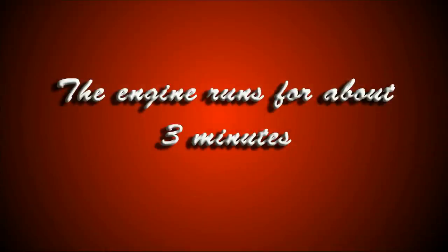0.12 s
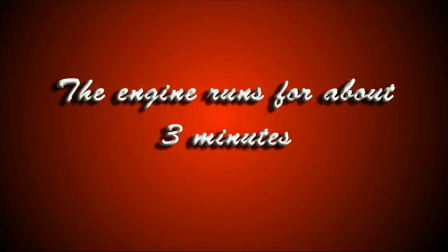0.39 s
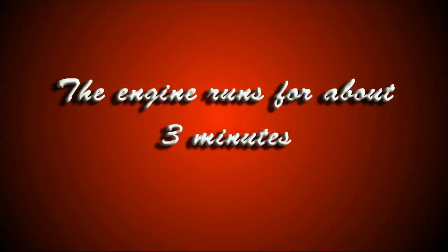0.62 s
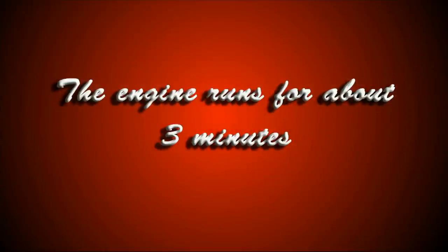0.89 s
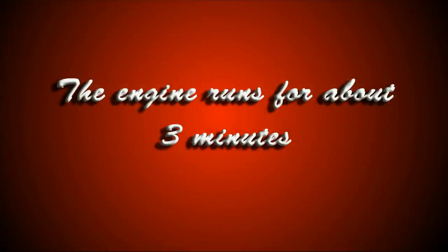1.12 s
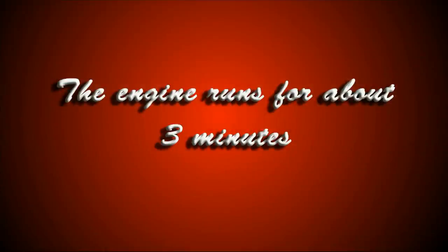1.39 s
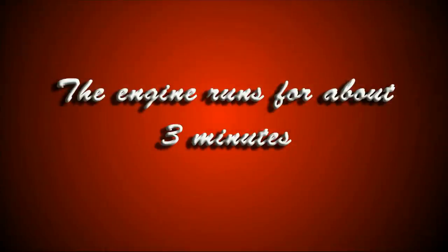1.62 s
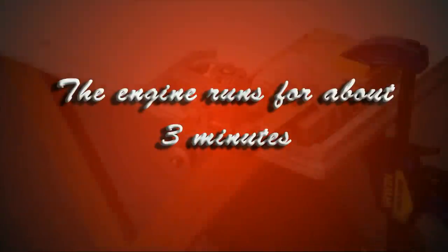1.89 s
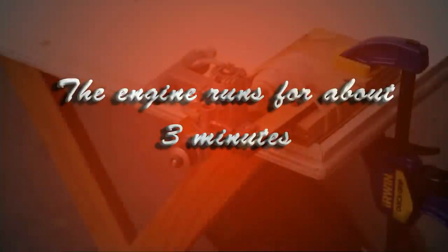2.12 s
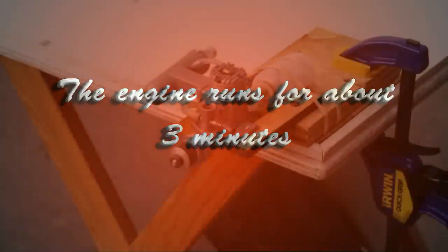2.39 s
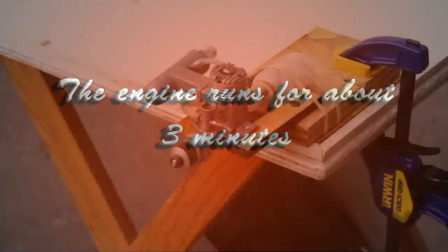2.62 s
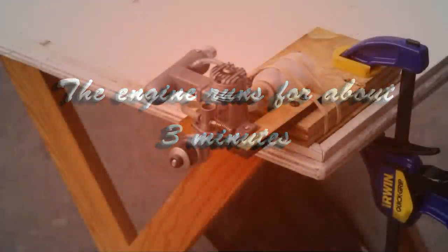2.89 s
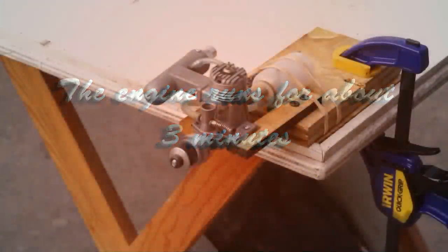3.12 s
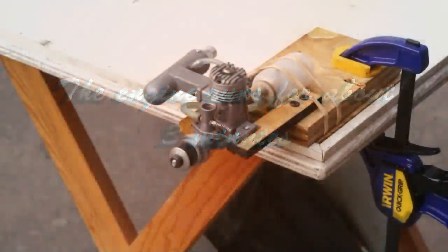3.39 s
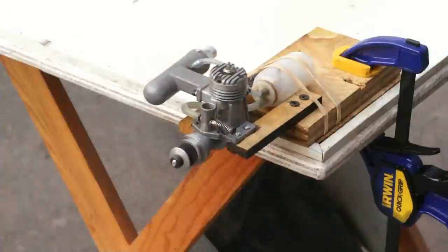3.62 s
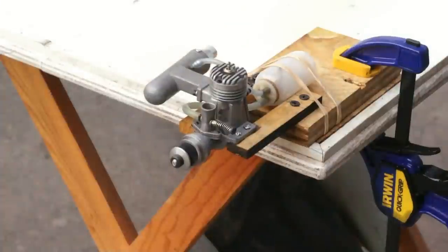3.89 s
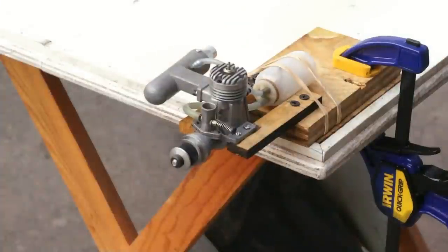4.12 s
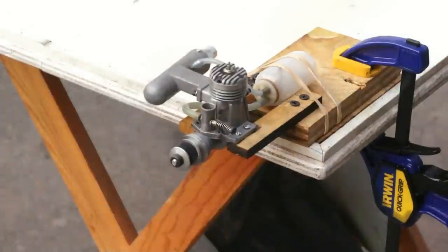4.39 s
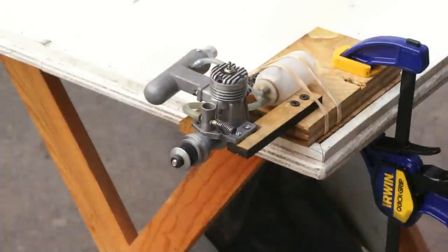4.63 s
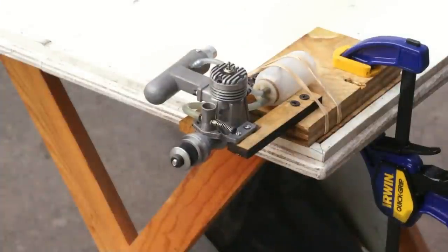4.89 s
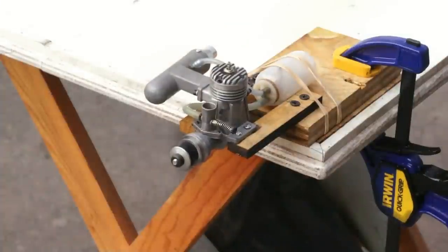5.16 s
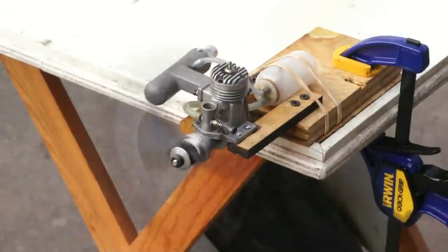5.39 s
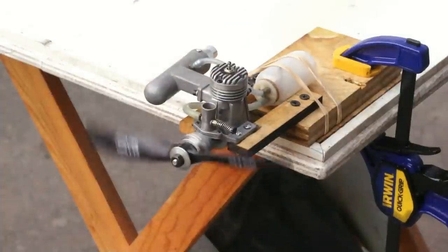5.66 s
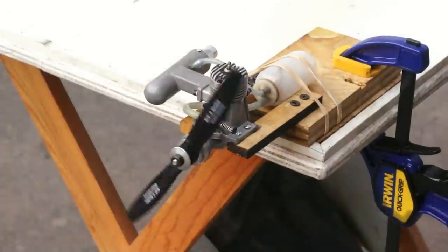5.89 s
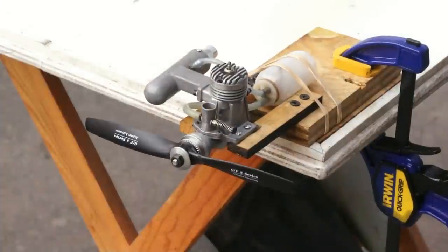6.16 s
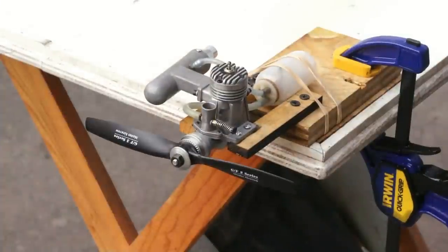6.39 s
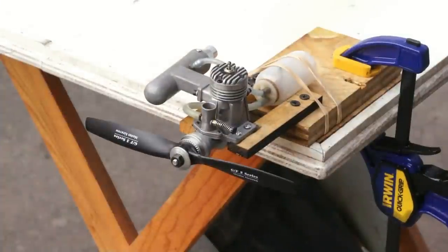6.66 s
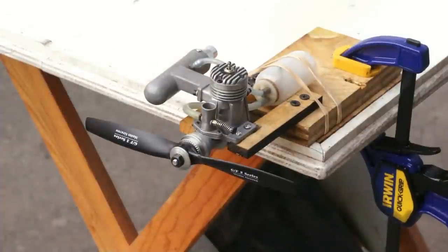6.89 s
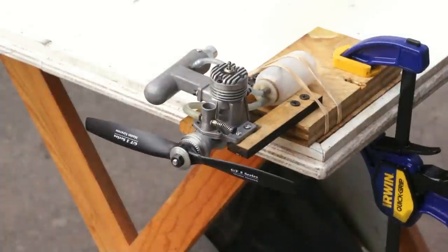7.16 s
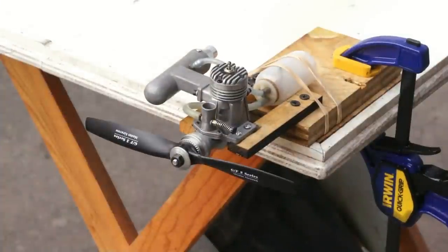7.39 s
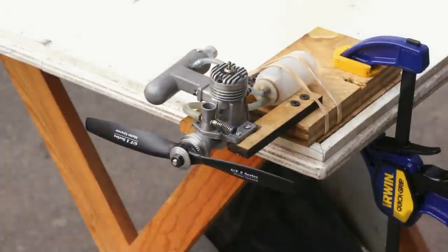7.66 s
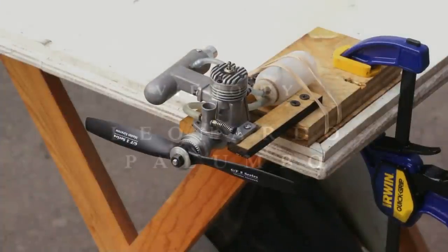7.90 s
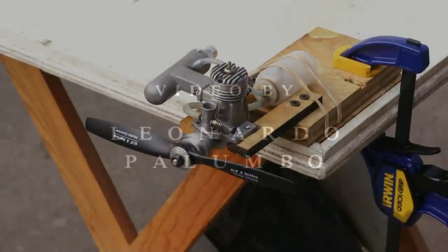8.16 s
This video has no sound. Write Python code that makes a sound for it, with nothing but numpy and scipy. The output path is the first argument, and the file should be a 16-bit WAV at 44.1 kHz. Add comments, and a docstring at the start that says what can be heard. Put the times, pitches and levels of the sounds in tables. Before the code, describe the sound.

Close outdoors, a tiny two-stroke engine clamped to a table screams at a steady, raspy buzz with bright hiss. It grows rougher, drops quickly in pitch to separate popping beats with clamp rattle and table shake, then stops. A few hollow, slowing bumps and ticks follow, then quiet low hum with faint rustle and a couple of dull knocks.

```python
"""Outdoors, at a trestle table: a small two-stroke glow engine clamped on top screams at full speed,
starves, slows through the table's resonances and stops after a few last compressions.
Summed multiples of the firing rate make the scream, ringing clicks the pops, rattle and table shake,
and pulsing noise the gas. Ticks, knocks and thin whistles of filtered noise follow, over a quiet
hum and rustle of shaped noise."""
import sys
import numpy as np
from scipy import signal
from scipy.fft import rfft, irfft, next_fast_len
from scipy.io import wavfile
from scipy.ndimage import uniform_filter1d

SR = 44100
rng = np.random.default_rng(int(sys.argv[2]) if len(sys.argv) > 2 else 0)


def amplitude_ratio(level_db):
    """Convert a level in decibels to the matching linear amplitude (field) ratio."""
    exponent = np.asarray(level_db, float) / 20
    return 10 ** exponent


def unload_wav(signal):
    """Save mono or channel-first audio to the path in sys.argv[1] as 16-bit WAV at rate SR, clipped to [-1, 1]."""
    wavfile.write(
        sys.argv[1],
        SR,
        np.round(np.clip(np.atleast_2d(signal).T, -1, 1) * 32767).astype(np.int16),
    )


N = 365133
STOP_S = 5.372   # the engine no longer fires


def rms_one(x):
    """Scaled to rms 1."""
    return x / np.sqrt(np.mean(x ** 2) + 1e-20)


def in_time(rows):
    """Table columns drawn as automation, one value a sample."""
    s, *columns = np.transpose(rows)
    return [np.interp(np.arange(N) / SR, s, c) for c in columns]


def at_hz(points, hz):
    """A curve over frequency, read on a log axis."""
    point_hz, level_db = np.array(points).T
    return np.interp(np.log(hz), np.log(np.maximum(point_hz, 1)), level_db)


def drift(rate, size):
    """Slow random wander between normally distributed knots, 2 * rate of them a second."""
    knots = rng.standard_normal(int(N / SR * rate * 2) + 2)
    return np.interp(np.arange(size) / SR * rate * 2, np.arange(len(knots)), knots)


def resonance(x, hz, width_hz):
    """Two-pole peak with gain 1 on top."""
    r = np.exp(-np.pi * width_hz / SR)
    zeros = [(1 - r * r) / 2, 0, (r * r - 1) / 2]
    poles = [1, -2 * r * np.cos(2 * np.pi * hz / SR), r * r]
    return signal.lfilter(zeros, poles, x + 1e-18)


def twice(x, hz, width_hz):
    """A resonance with steeper flanks."""
    return resonance(resonance(x, hz, width_hz), hz, width_hz)


def body(x, modes):
    """Parallel resonances of a solid or hollow body, signs alternating."""
    return sum((-1) ** k * amplitude_ratio(db) * resonance(x, hz, width) for k, (hz, width, db) in enumerate(modes))


def evened(x, window_s):
    """Running level divided out."""
    return x / np.sqrt(uniform_filter1d(x ** 2, int(window_s * SR), axis=-1) + 1e-12)


def coloured(spectrum, likeness, size):
    """Stereo noise of a given spectrum, the channels alike to a degree; rms 1."""
    length = next_fast_len(size)
    hz = np.arange(length // 2 + 1) * SR / length + 1
    alike = np.clip(at_hz(likeness, hz), 0, 1)
    mid, side = rfft(rng.standard_normal((2, length)))
    pair = np.sqrt(1 + alike) * mid + np.sqrt(1 - alike) * side * np.array([[1], [-1]])
    return rms_one(irfft(pair * amplitude_ratio(at_hz(spectrum, hz)), length)[:, :size])


def spread(x, echo_db, delays_s):
    """Table top and ground send short echoes, other ones to each microphone."""
    out = np.array([x, x])
    for side, delay in enumerate(delays_s):
        lag = int(delay * SR)
        out[side % 2, lag:] += amplitude_ratio(echo_db) * x[:-lag]
    return out


def impulses(turns, spread_db, weak_db):
    """One click per whole turn, sizes uneven, every second one changed by weak_db."""
    at = np.flatnonzero(np.diff(np.floor(turns)))
    out = np.zeros(len(turns))
    uneven_db = spread_db * rng.standard_normal(4000)[:len(at)]
    out[at] = amplitude_ratio(uneven_db + weak_db * (np.arange(len(at)) % 2))
    return out


def slowness(hz):
    """0 at 125 firings a second and above, 1 from 75 down."""
    return np.clip((125 - hz) / 50, 0, 1)


def singleness(hz):
    """How far the firings are heard singly: 0 above 202.7 a second, 1 below 167.7."""
    return np.clip((167.7 - hz) / 35 + 1, 0, 1)


def crawling(hz):
    """Rises from 0 to 1 as the engine crawls from 93 to 46.5 firings a second."""
    return np.clip(2 - 2 * hz / 93, 0, 1)


def puff(turns):
    """Gas rushes out just after the port opens, then thins until the next turn."""
    return np.exp(-2.5 * (turns % 1))


def muffler_gap(x, hz):
    """The muffler swallows a band around 2600 Hz at low speed."""
    return x - 0.8 * slowness(hz) * resonance(x, 2600, 420)


# Firing speeds at which the tone colour flips: speed_hz
FLIP_SPEEDS = [212.6, 214.8, 217.5, 219.15]
# Multiples of the firing rate from the second up, one a row:
# full_speed_db, dipping_db, sagging_db, sagging_further_db, lean_db
MULTIPLES = [(-0.5, -1.5, -2, -1, -6.5), (-6.5, -8.5, -12, -12, -5), (-3.5, -1, -2.5, -0.0, -0.5),
             (-14, -14.5, -18.5, -11, -6), (-10.5, -11, -8, -3, -6.5), (-9.5, -8, -3, -3.0, -0.5),
             (1.0, 0.5, -7.5, 1.0, -2), (-11, -8.5, -20, -10, -0.5), (-4.5, -11.5, -5, -6.0, -8),
             (-3.5, 1, -0.0, -2, -1), (-3.0, 0.5, -6.5, -3.5, -2), (-8, -5, -10.5, -12, -8),
             (-3, -13.5, -11, -2.5, -3.5), (-8, -9.5, -8.5, -13, -14.5), (-13.5, -11, -8, -15, -6.5),
             (-18, -15, -12.5, -20, -16), (-10.5, -10, -13.5, -4.5, -8), (-14, -17, -4, -18, -7.5),
             (-4.5, -3, -10, -3.5, -5.5), (-5.5, -4.5, -4.5, -9, -14), (-9.0, -4.5, -9.5, -14, -7.5),
             (-11.5, -14, -16, -15.5, -16), (-12, -18.5, -23.5, -9.5, -12.5), (-12, -8, -10.0, -9.5, -15),
             (-11, -15, -20, -21, -15), (-11, -12, -11, -25, -20.5), (-8, -9, -4.5, -7, -13.0),
             (-10.0, -11.5, -14.5, -10.5, -11.5), (-13.5, -9, -15, -11, -16), (-11.5, -19, -23, -12, -14.5),
             (-9, -13, -8.5, -9.5, -12.5), (-19.5, -22, -21.5, -25.5, -20.5), (-20.5, -14.5, -21, -19, -12),
             (-26.5, -19.5, -22, -15, -19), (-19.5, -13.5, -18, -16.5, -19.5), (-14, -13, -17, -27, -18.5),
             (-31, -19.0, -20.5, -20, -21.5), (-23, -19.5, -18, -21, -25.5), (-23, -21, -25.5, -30, -27.5)]
# Halves .5, 1.5, 2.5 .. from strong and weak firings in turn, one a row:
# full_speed_db, dipping_db, sagging_db, sagging_further_db, lean_db
HALF_ORDERS = [(-19, -17.5, -16.5, -16.5, -17.5), (-21.5, -20.5, -20, -16.5, -16.5),
               (-8.5, -9.0, -8, -11.5, -13.5), (-3, -1.5, -3.0, -4.5, -12.5),
               (-22.5, -15.5, -13, -11.5, -8.5), (-11.5, -16, -9, -7.5, -16), (-7, -8, -3.5, -16.5, -12),
               (-13.5, -11, -6, -9.5, -16), (-20.0, -16.5, -21, -28, -12.5),
               (-13.5, -18, -15.5, -11.5, -24.5), (-20.0, -21, -18, -17.5, -25.5),
               (-26, -19.5, -26.5, -21.5, -28.5), (-22.5, -26, -19.5, -25.5, -33),
               (-27.0, -24.5, -23.5, -28.5, -30), (-16.5, -23.5, -14.5, -22.5, -27.5),
               (-37.5, -37.5, -31, -31.5, -22.5)]
# Fixed resonances of pipe and mount that each multiple passes as the engine slows: pitch_hz, level_db
PIPE_AND_MOUNT = [(150, -22), (230, -12), (300, -1), (400, -5), (480, -11), (570, -3), (690, -14),
                  (870, -3), (990, -12), (1190, -4), (1380, -11), (1450, -1), (1580, -10), (1760, -5),
                  (1950, -7), (2230, -3), (2450, -8), (2700, -14), (2950, -5), (3200, -10), (3600, -8),
                  (3750, -13), (4100, -8), (5000, -11), (6500, -14)]


def tones(turns, hz, rough):
    """Multiples of the firing rate sum to a downward spike; pipe and table favour others as speed sags."""
    size = len(hz)
    out = np.zeros((2, size))
    orders = list(np.arange(len(MULTIPLES)) + 2) + list(np.arange(len(HALF_ORDERS)) + .5)
    # radians by which the multiples fall out of step: a sharp spike when lean, a blurred one when fast
    smear = np.interp(hz, FLIP_SPEEDS[1:3], [0.9, 1.7])
    flips = np.ravel([(flip - 0.2, flip + 0.2) for flip in FLIP_SPEEDS])
    passing_hz, fade_db_per_hz = 204, 1.2
    tail = np.argmax(hz < passing_hz)
    tail_hz = hz[tail:]
    passing = np.clip((passing_hz - tail_hz) / 15, 0, 1)
    octaves = np.log2(passing_hz / tail_hz)
    for order, colours_db in zip(orders, [*MULTIPLES, *HALF_ORDERS]):
        start, pan_db, lead = rng.normal(), 1.5 * rng.normal(), 0.45 * rng.normal()
        flipping_db = np.repeat(colours_db[::-1], 2)[1:-1]   # lowest speed first
        line_db = np.interp(hz, flips, flipping_db) + 1.5 * drift(5.5, size)
        if order % 1:
            line_db[tail:] -= fade_db_per_hz * np.clip(160 - tail_hz, 0, 28)
        else:
            line_hz = order * tail_hz
            dull_db = -6 * octaves * np.clip(np.log2(line_hz / 1400), 0, 1)
            passed_db = at_hz(PIPE_AND_MOUNT, line_hz) + dull_db + 3 * drift(9, len(line_hz))
            line_db[tail:] += passing * (passed_db - line_db[tail:])
        gain = amplitude_ratio(line_db)
        phase = (np.pi if order % 1 else smear) * start
        angle = 2 * np.pi * order * turns + phase + 0.006 * order * drift(17, size)
        out[0] -= gain * amplitude_ratio(pan_db / 2) * np.cos(angle + lead / 2)
        out[1] -= gain * amplitude_ratio(-pan_db / 2) * np.cos(angle - lead / 2)
    fast_db = 2.5 - 10.5 * rough
    level_db = fast_db + (-16 - fast_db) * singleness(hz)
    level_db -= fade_db_per_hz * np.clip(84.3 - hz, 0, 28)   # the tones sink at the crawl
    return amplitude_ratio(level_db) * evened(out, 0.12)


# Muffler resonances: pitch_hz, width_hz, level_db
MUFFLER_MODES = [(880, 220, 4.5), (1127, 38, 10), (1473, 29, 17.5), (1800, 110, 3), (2400, 88, -18),
                 (2976, 20, 12), (4600, 170, -6)]
# Crankcase resonances on the intake side: pitch_hz, width_hz, level_db
CRANKCASE_MODES = [(299, 45, 11.5), (365, 160, 4), (571, 19, 6), (740, 500, -8.5)]
# The exhaust port rings with each crack: pitch_hz, width_hz, level_db
PORT_MODES = [(2090, 160, 8.5), (3470, 630, -2.5), (3960, 860, 2), (5100, 210, -1.5), (7550, 460, 3)]


def pops(turns, hz, rough):
    """Each firing clicks into muffler, port and crankcase; a slower port opening cracks lower."""
    slow = slowness(hz)
    firings = resonance(impulses(turns, spread_db=.6, weak_db=-.2), 1200, 2500)
    crack = (1 - slow) * twice(firings, 2100, 1800) + 1.7 * slow * twice(firings, 1200, 1300)
    # a thin ring comes out at low speed
    thin_gain = slow * np.clip((hz - 50) / 30, 0.15, 1) * amplitude_ratio(14)
    crack = crack + thin_gain * twice(firings, 2950, 90)
    crack = crack + slow ** 2 * amplitude_ratio(4.5) * twice(firings, 1000, 640)   # lower still near the stop
    port = amplitude_ratio(9.5 - 9.3 * slow) * body(firings, PORT_MODES)
    # the intake side answers a little later
    thump = np.roll(body(firings, CRANKCASE_MODES), round(0.00368 * SR))
    popping = evened(body(firings, MUFFLER_MODES) + amplitude_ratio(6.5) * crack + port + amplitude_ratio(18.5) * thump, 0.23)
    fast_db = -28 + 10 * rough
    level_db = fast_db + (-14.5 - fast_db) * singleness(hz) + 3 * crawling(hz)
    return amplitude_ratio(level_db) * muffler_gap(popping, hz)


# Clamp resonances while the engine runs fast: pitch_hz, width_hz, level_db
FAST_CLAMP = [(546, 26, -2), (818, 100, -10), (1230, 39, 2.5), (1353, 26, -11.5), (1744, 23, 0),
              (2690, 33, -13.5)]
# The clamp rings lower as the engine slows: pitch_hz, width_hz, level_db
SLOW_CLAMP = [(566, 60, -10), (917, 80, 0), (1200, 43, -3.5), (1720, 47, -8.5), (2550, 72, -8.5)]


def rattle(turns, hz, rough):
    """The clamp bounces slower than the engine fires, so only some firings strike it hard."""
    firings_per_bounce = 5.5
    bounce = np.cos(2 * np.pi * (turns / firings_per_bounce + .01 * drift(20, len(hz))))
    strikes = -impulses(turns, spread_db=2.5, weak_db=0) * (amplitude_ratio(13 * bounce) - 1.6)
    loose = np.clip((204 - hz) / 20, 0, 1)
    ringing = (1 - loose) * body(strikes, FAST_CLAMP) + loose * body(strikes, SLOW_CLAMP)
    return amplitude_ratio(-37.5 + 30.5 * rough) * rms_one(resonance(ringing, 1500, 2000))


# Gas roar spectrum, relative: pitch_hz, level_db
ROAR_SPECTRUM = [(150, -32), (260, -13.5), (307, -19.5), (538, -10), (741, -17), (810, -8), (1130, -10),
                 (1460, -3), (1610, -6.5), (2190, -6), (5500, -16), (7150, -44), (12100, -120)]
# How alike left and right are, 0 to 1: pitch_hz, likeness
STEREO_LIKENESS = [(60, 0.95), (240, 0.69), (950, 1), (3770, 1), (15000, 0.84)]


def roar(turns, hz, rough):
    """Gas noise pulses with each firing and sinks between single firings."""
    pulse = .5 + (0.1 + 0.3 * slowness(hz)) * puff(turns)
    noise = rms_one(coloured(ROAR_SPECTRUM, STEREO_LIKENESS, len(hz)) * pulse)
    level_db = -18.5 + 6.5 * rough - 6.5 * singleness(hz) + 6.5 * crawling(hz)
    return amplitude_ratio(level_db) * muffler_gap(noise, hz)


# Gas hiss spectrum, relative: pitch_hz, level_db
HISS_SPECTRUM = [(1470, -36.5), (2500, -11), (3080, -12.5), (3560, -9), (3880, -5), (5000, -4.5),
                 (5570, -5), (6110, -2.5), (8510, -3.5), (9700, -7), (10800, -8), (13400, -14),
                 (15800, -23)]
# Cooling fins ring in the hiss at speed: pitch_hz, width_hz, level_db
FAST_FINS = [(8100, 76, -16.5), (10680, 370, -5.5), (13000, 310, -12.5)]
# Other fins ring once the engine slows: pitch_hz, width_hz, level_db
LATE_FINS = [(7070, 200, -3.5), (12400, 450, 0), (14500, 350, -0.5)]


def fin_ring(x, fins):
    """Cooling fins as parallel resonances, all of one sign."""
    return sum(amplitude_ratio(db) * resonance(x, fin_hz, width) for fin_hz, width, db in fins)


def hiss(turns, hz, exhaust_db):
    """Bright gas noise, faintly pulsing; slower gas hisses duller and weaker."""
    noise = coloured(HISS_SPECTRUM, STEREO_LIKENESS, len(hz)) * (.5 + 0.13 * puff(turns))
    fast = rms_one(noise) * amplitude_ratio(1.1 * drift(14, len(hz)))
    dull = signal.lfilter(*signal.butter(1, 11000, fs=SR), fast)
    slowing = np.clip((186 - hz) / 40, 0, 1)
    gas = (1 - slowing) * (fast + fin_ring(fast, FAST_FINS)) + slowing * (dull + fin_ring(dull, LATE_FINS))
    follow_db = 0.18 * (exhaust_db - exhaust_db.mean())   # a share of the exhaust's swing
    return amplitude_ratio(-30.5 + 6.5 * np.log2(hz / 221) + follow_db) * gas


# How hard the table shakes; it peaks where a multiple meets a resonance: firing_rate_hz, level_db
TABLE_SHAKE = [(46, -23), (51, -29.5), (57, -35), (68, -38.5), (84.5, -49), (87, -28), (91, -31.5),
               (97, -43), (105, -45), (121, -40), (128, -71), (136, -49), (144, -25), (152, -22.5),
               (165, -32), (176, -28), (192, -32.5), (211, -30.5), (220, -29)]


def shaking_table(turns, hz):
    """Firings drive the table top's resonance near 180 Hz."""
    steady = impulses(turns, spread_db=0.43, weak_db=1)
    table = evened(twice(twice(steady, 180, 210), 180, 60), 0.024)
    level_db = at_hz(TABLE_SHAKE, hz) + 1.1 * drift(6, len(hz))
    return amplitude_ratio(level_db) * spread(table, echo_db=-14.5, delays_s=[.0021, .0005])


def low_beat(turns, hz):
    """The bare firing rate as a sine, in below 150 firings a second and out again towards 55."""
    fade = np.clip((150 - hz) / 15, 0, 1) * np.clip((hz - 55) / 35, 0, 1)
    return amplitude_ratio(-33) * fade * np.sin(2 * np.pi * turns)


# Firing rate through the run: at_s, firing_rate_hz
FIRING_RATE = [(0, 219.8), (.2, 219.4), (.33, 217.9), (.5, 219.6), (1.0, 219.6), (1.1, 220.6), (1.2, 218.9),
               (1.3, 218.8), (1.5, 216.3), (1.6, 215.8), (1.75, 213.9), (1.9, 214.3), (2.0, 213.2),
               (2.1, 211.7), (2.3, 212), (2.4, 209.7), (2.55, 211.8), (2.8, 209.3), (3.0, 210.1),
               (3.48, 208), (3.545, 203.6), (3.74, 179), (3.87, 154.2), (3.935, 144.7), (4.0, 137.5),
               (4.098, 133.9), (4.216, 124.3), (4.282, 119.8), (4.374, 114.9), (4.594, 98), (4.66, 94.1),
               (4.704, 90), (4.744, 89), (4.854, 90.3), (4.9, 89.9), (4.944, 86.9), (5.002, 84.5),
               (5.05, 81.4), (5.2, 68.6), (5.232, 65.8), (5.274, 60.8), (5.38, 46.5)]
# Exhaust level and roughness (0 to 1) of the running: at_s, exhaust_db, roughness
RUNNING = [(0, -21.5, 0.12), (1.4, -21, 0.23), (1.65, -21, 0.23), (1.75, -18, 0.57), (1.99, -18, 0.49),
           (2.11, -23.5, 0.29), (2.44, -19, 0.37), (2.56, -21.5, 0.43), (2.75, -19, 0.55),
           (2.795, -18, 0.88), (3.66, -15, 0.96), (3.8, -13.5, 0.82), (3.95, -14, 0.3), (4.15, -15.5, 0.3),
           (4.73, -15.5, 0.36), (4.9, -14.5, 0.36), (5.2, -15, 0.4), (5.3, -18.5, 0.1), (5.38, -24.5, 0.1)]


def engine():
    """Firing speed and roughness drive exhaust tones, pops, gas noise, table and rattling clamp."""
    size = round(STOP_S * SR)
    hz, exhaust_db, rough = [c[:size] for c in in_time(FIRING_RATE) + in_time(RUNNING)]
    turns = np.cumsum(hz) / SR
    turns -= turns[round(5.3505 * SR)]   # lines up the last firing
    struck = pops(turns, hz, rough) + rattle(turns, hz, rough)
    struck = spread(struck, echo_db=-15, delays_s=[.0003, .0006, .0036, .0031])
    exhaust = tones(turns, hz, rough) + struck + low_beat(turns, hz) + roar(turns, hz, rough)
    out = amplitude_ratio(exhaust_db) * exhaust + hiss(turns, hz, exhaust_db) + shaking_table(turns, hz)
    out[:, -400:] *= np.linspace(1, 0, 400)
    return np.pad(out, ((0, 0), (0, N - size)))


# Hum spectrum, relative: pitch_hz, level_db
HUM_SPECTRUM = [(18, -31.5), (30, -10.5), (119, -6.5), (288, -14), (355, -21), (394, -17), (716, -18),
                (837, -21.5), (928, -22), (3680, -34), (15000, -45.5)]
# Levels of the quiet bed: at_s, hum_db, rustle_db
QUIET_BED = [(5.8, -55.5, -86), (6.05, -56, -73.5), (6.4, -56, -72.5), (6.8, -59.5, -76), (7.3, -60, -76),
             (7.6, -61, -82), (8.17, -63, -75), (8.28, -66.5, -84.5)]


def outdoors():
    """Low distant hum and a faint bright rustle that comes and goes, both shaped noise."""
    hum_db, rustle_db = in_time(QUIET_BED)
    hum = coloured(HUM_SPECTRUM, [(50, 0.31), (1000, .7), (10000, 0.37)], N)
    rustle_spectrum = [(2500, -29.0), (4500, 1.0), (8000, -7.5), (13000, -15.0), (16000, -19.5)]
    rustle = coloured(rustle_spectrum, [(1, .6), (2, 0.69)], N)
    return hum * amplitude_ratio(hum_db + 1.3 * drift(9.6, N)) + rustle * amplitude_ratio(rustle_db + 1.7 * drift(25, N))


# Last compressions without firing, the drive into the cylinder: at_s, drive_db
COMPRESSIONS = [(5.371, -19), (5.394, -20), (5.417, -24), (5.442, -21), (5.466, -20.5), (5.498, -22.5),
                (5.544, -26), (5.599, -26), (5.67, -33.5), (5.758, -38), (5.891, -50)]
# Cylinder resonances: pitch_hz, width_hz, level_db
CYLINDER_MODES = [(349, 55, 6), (568, 31, 7), (880, 93, -2.5)]


def last_turns():
    """The piston bumps over compression: a hollow pop each turn, table and propeller dying away."""
    hollow, bright = np.zeros((2, N))
    for k, (s, drive_db) in enumerate(COMPRESSIONS):
        # every second pop is duller, and all of them lose brightness after 5.45 s
        bright_db = -15.5 - 5 * (1 - k % 2) - 170 * max(s - 5.45, 0)
        at = round(s * SR)
        hollow[at], bright[at] = amplitude_ratio(drive_db + 34.5), amplitude_ratio(bright_db + 26.0)
    bumps = twice(body(hollow, CYLINDER_MODES), 520, 800)
    bumps = bumps + twice(resonance(bright, 1200, 2500), 1050, 800)
    t = np.arange(N) / SR
    # the table's last sway swells slowly to 5.46 s, then drops fast (dB per s)
    sway_db = -31 - np.maximum(4 * (5.46 - t), 150 * (t - 5.46))
    sway = rms_one(resonance(rng.standard_normal(N), 165, 33)) * amplitude_ratio(sway_db)
    # the propeller's last swish peaks at 5.38 s
    swish_spectrum = [(300, -24), (700, 2.0), (1500, -5.0), (4000, -10.0), (12000, -33.5), (16000, -32.5)]
    swish = coloured(swish_spectrum, STEREO_LIKENESS, N) * amplitude_ratio(-36 - 105 * np.abs(t - 5.38))
    after = np.clip((t - STOP_S) / 0.0089 + 1, 0, 1)   # fades in as the engine fades out
    return spread(bumps, echo_db=-8.5, delays_s=[.003, .004, .011, .013]) + after * (sway + swish)


# Bright ticks and brushes, t60 of the fast part: start_s, peak_db, centre_hz, t60_s
BRIGHT_TICKS = [(5.394, -29.5, 3970, 0.056), (5.4555, -27, 4840, 0.044), (5.4806, -28, 3400, 0.033),
                (5.5755, -39, 8500, 0.045), (5.576, -34.5, 2930, 0.025), (5.7342, -36, 3660, 0.04),
                (5.736, -43.5, 1900, 0.071), (6.095, -56, 6000, .02), (6.106, -53, 6040, .022),
                (6.1662, -40, 7870, 0.016), (6.2023, -39.5, 7530, .03), (6.504, -44, 1704, 0.072),
                (6.507, -39, 4440, .089), (6.575, -51.5, 7980, 0.012), (6.8884, -54, 7900, 0.021),
                (7.0605, -57, 9000, .18), (7.0814, -50.5, 8140, .03), (7.194, -55.5, 2500, .1),
                (7.2167, -50.5, 1990, .03), (7.481, -57, 6200, .03), (7.217, -51.5, 6870, .015),
                (7.2617, -57, 7000, .015), (7.33, -60, 1500, .4), (7.36, -53, 700, .5),
                (7.42, -57.5, 6900, .3), (7.4445, -56, 9500, .021), (7.634, -62.5, 9000, .014),
                (7.465, -56.5, 7030, .08), (8.091, -57.5, 5940, .05), (8.1394, -56, 7000, 0.1)]


def ticks():
    """Short bursts of band-limited noise, each with a quick decay and a fainter, slower tail."""
    out, t = np.zeros((2, N)), np.arange(12000) / SR
    for s, peak_db, hz, t60 in BRIGHT_TICKS:
        width_hz = min(3700, 0.94 * hz)
        noise = resonance(rng.standard_normal((2, len(t))), hz, 1.2 * width_hz)
        noise = noise[0] + 0.39 * noise   # mostly common to both sides
        decay = amplitude_ratio(-60 * t / t60) + 0.082 * amplitude_ratio(-12 * t / t60)
        burst = resonance(noise * decay, hz, width_hz)
        at = round(s * SR)
        out[:, at:at + len(t)] += (amplitude_ratio(peak_db) * burst / np.abs(burst).max())[:, :N - at]
    return out


# Dull knocks, level before panning, t60 of the noise trailing the blow: start_s, level_db, pitch_hz, t60_s
DULL_KNOCKS = [(6.5035, -35.5, 328, 0.071), (7.3257, -45.5, 360, 0.15), (7.9978, -42.5, 300, 0.12)]
# Rebounds after each knock: delay_s, level_db
KNOCK_REBOUNDS = [(0.0128, -9), (.0205, -14), (.031, -10)]


def knocks():
    """A blow, a few rebounds and trailing noise excite a dull ring, stronger on the right."""
    out, t = np.zeros((2, N)), np.arange(12000) / SR
    for s, level_db, hz, t60 in DULL_KNOCKS:
        blows = 0.034 * rng.standard_normal(len(t)) * amplitude_ratio(-60 * t / t60)
        blows[0] = 1
        for delay, db in KNOCK_REBOUNDS:
            blows[round(delay * SR)] = amplitude_ratio(db)
        ring = resonance(twice(blows, hz, 420), hz, 420)
        at = round(s * SR)
        out[:, at:at + len(t)] += amplitude_ratio(level_db) * ring[:N - at] / np.abs(ring).max() * amplitude_ratio([[-2], [1]])
    return out


# Faint whistles: start_s, end_s, pitch_hz, width_hz, level_db
THIN_WHISTLES = [(7.07, 7.17, 6450, 500, -71), (7.52, 7.61, 3570, 200, -76), (7.646, 7.74, 3620, 200, -75),
                 (7.746, 7.86, 3800, 150, -81), (7.68, 8.025, 8470, 508, -86), (7.8, 8.204, 4790, 300, -82)]


def whistles():
    """Narrow bands of noise swell in and out as faint thin whistles in the quiet."""
    t, out = np.arange(N) / SR, 0
    for start, end, hz, width_hz, db in THIN_WHISTLES:
        swell = np.clip(np.minimum(t - start, end - t) / 0.03, 0, 1)
        line = twice(rng.standard_normal((2, N)), hz, width_hz)
        out = out + amplitude_ratio(db) * swell * rms_one(line)
    return out


def scene():
    """All layers summed, the whole picture sitting slightly to the right."""
    left_against_right_db = -0.75
    layers = engine() + outdoors() + last_turns() + ticks() + knocks() + whistles()
    return layers * amplitude_ratio([[left_against_right_db / 2], [-left_against_right_db / 2]])


def low_pass(x):
    """Removes everything above the highest recorded frequency."""
    return signal.sosfilt(signal.butter(12, 15910, fs=SR, output="sos"), x)


def record(dry):
    """The microphone drops the deep bass, below 60 Hz."""
    bass_cut = signal.butter(2, 60, "high", fs=SR, output="sos")
    finished = signal.sosfilt(bass_cut, dry)
    return low_pass(finished)


dry = scene()
out = record(dry)
unload_wav(out)
```